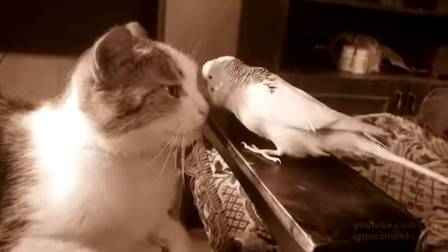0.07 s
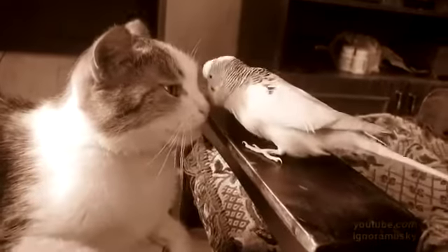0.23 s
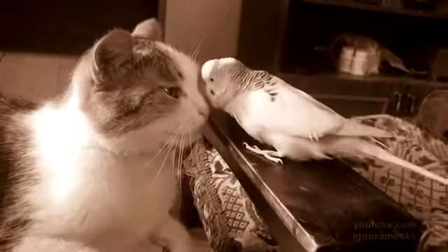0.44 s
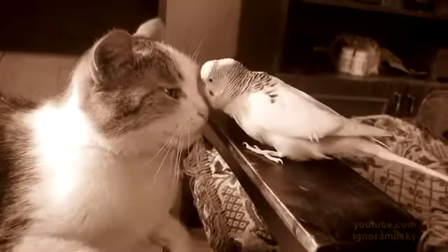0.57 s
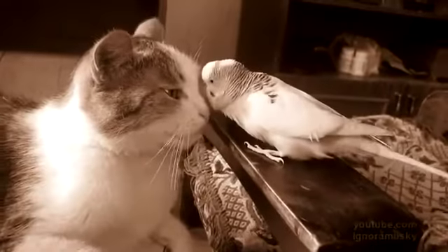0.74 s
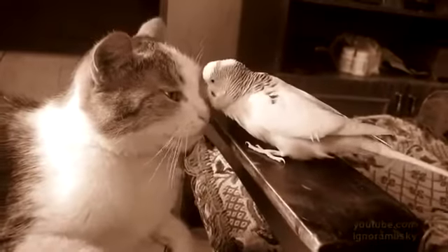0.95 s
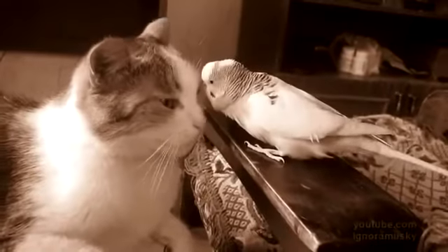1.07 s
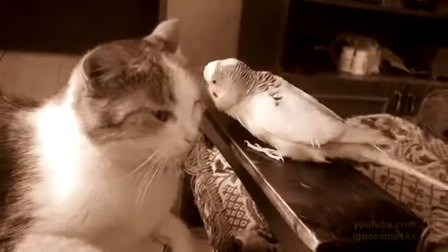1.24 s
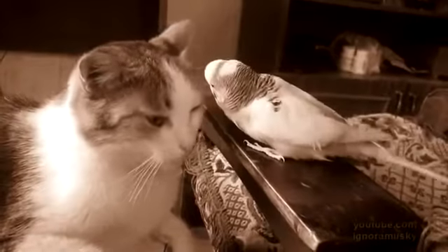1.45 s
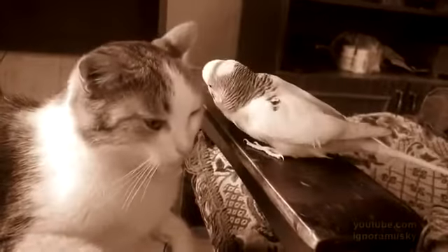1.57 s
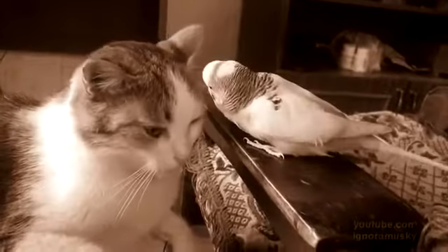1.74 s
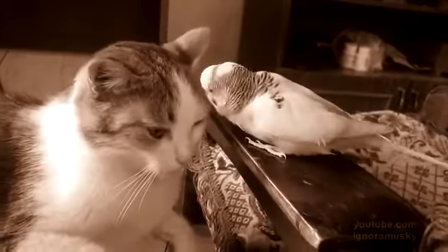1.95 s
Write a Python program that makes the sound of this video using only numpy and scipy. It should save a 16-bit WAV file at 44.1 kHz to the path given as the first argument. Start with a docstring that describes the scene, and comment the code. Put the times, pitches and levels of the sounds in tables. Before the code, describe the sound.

A budgerigar close by gives two tiny pips, then at 0.2 seconds a nasal rising call that breaks into one loud, harsh squawk at about 0.45 seconds. From 0.8 to 1.1 seconds it mutters a few soft, slurred notes, then chatters in rapid, high, ticking pips until about 2 seconds. Behind it, an appliance hums and whines faintly in the steady noise of a small furnished room.

```python
"""A budgerigar, close by in a small furnished room, gives two pips and a nasal rising call that breaks
into one harsh squawk, mutters a few soft slurs, then chatters in very short pips, about thirty a second.
Call and squawk follow the source-filter principle: a periodic or a chaotic source is shaped by the throat.
An appliance hums and whines behind it; the automatic gain ducks at the squawk and creeps back."""
import sys
import numpy as np
from scipy import signal
from scipy.fft import rfft, irfft
from scipy.io import wavfile
from scipy.ndimage import uniform_filter1d

SR = 44100
rng = np.random.default_rng(int(sys.argv[2]) if len(sys.argv) > 2 else 0)


def int16_out(signal):
    """Quantize to a 16-bit WAV file."""
    q = np.round(np.clip(np.atleast_2d(signal).T, -1, 1) * 32767)
    wavfile.write(sys.argv[1], SR, q.astype(np.int16))


N = 88200

# spectrum of the room noise: f/Hz, relative density/dB
ROOM_NOISE_SPECTRUM = [(25, -1.5), (75, -5), (120, -0.5), (210, 2.5), (280, 6.5), (330, 1.5), (520, 2.5),
                       (750, -2), (1100, -1), (1600, -4), (3100, -6), (4500, -13), (7000, -24.5),
                       (10000, -30.5), (15000, -38)]
# partials of the appliance's hum: f/Hz, rms level/dB, wander/Hz
HUM_PARTIALS = [(117.3, -55, 3), (172.4, -59, 12.5), (270, -51.5, 7.1), (394.5, -54.5, 2.14),
                (460, -51, 2.53), (690, -53.5, 1.1), (1152, -54, 15.3)]
# chatter pips: start t/s, peak level/dB, f/Hz, length/ms
CHATTER_PIPS = [(.0097, -21.5, 5770, 0.97), (.035, -32.5, 5940, 1.3), (1.1303, -27.5, 2940, 2.4),
                (1.1635, -17.5, 3450, 1.03), (1.1941, -14.5, 3500, 1), (1.225, -18, 3070, 3.2),
                (1.2544, -18, 3180, 3), (1.2844, -16, 2960, 4.3), (1.3155, -24, 3240, 2.1),
                (1.3466, -24, 3500, 2.3), (1.3774, -26, 3080, 1.6), (1.409, -19.5, 2980, 3.3),
                (1.4408, -20.5, 2670, 3.7), (1.4719, -18.5, 2720, 5.2), (1.5041, -20, 2730, 3.7),
                (1.5385, -26.5, 2600, 0.96), (1.6304, -23, 3570, 1.2), (1.668, -20, 2980, 1.9),
                (1.702, -19.5, 2520, 2.5), (1.7331, -15, 2770, 4.3), (1.7657, -17, 2740, 4.1),
                (1.7989, -19, 2700, 4.7), (1.8326, -22, 2800, 3.1), (1.8664, -18, 2780, 4.5),
                (1.901, -18, 2560, 3), (1.934, -18.5, 2580, 1.8), (1.967, -15.5, 3700, 1.03)]
# course of the rising call: t/s, pitch f/Hz, level/dB, beak resonance f/Hz
CALL_CONTOUR = [(.213, 796, -46, 2100), (.219, 853.5, -33.5, 2100), (.231, 875, -25.5, 3500),
                (.245, 809, -32, 3270), (.256, 825, -40, 3350), (.261, 835, -43, 3400),
                (.266, 862, -35, 3530), (.275, 940, -36, 3930), (.288, 967, -34, 4850),
                (.307, 1008, -40.5, 4720), (.347, 1012, -42, 4600), (.36, 1119, -39.5, 5670),
                (.38, 1199, -38, 4660), (.389, 1336, -33.5, 5400), (.406, 1410, -31, 2850),
                (.42, 1502, -60, 3000)]
# spectral envelope of the call: f/Hz, relative level/dB
THROAT_SPECTRUM = [(850, 0), (2600, -3), (3500, -3.5), (4300, -9.5), (6100, -13), (7000, -24), (14000, -57)]
# envelope of the squawk: t/s, level/dB
SQUAWK_ENVELOPE = [(.388, -47), (.405, -35.5), (.411, -26.5), (.421, -23.5), (.427, -16), (.438, -9.5),
                   (.444, -14), (.4505, -7), (.456, -12.5), (.467, -21), (.483, -19.5), (.495, -28),
                   (.515, -46)]
# throat resonances in the squawk: f/Hz, bandwidth/Hz, gain/dB
THROAT_MODES = [(920, 110, -10.5), (2060, 940, -2.5), (3326, 680, 7), (5530, 790, 5), (6460, 310, 4.5),
                (8000, 1540, -3.5), (11700, 5900, -38)]
# added gain of the deep resonances: t/s, gain/dB
DEEP_MODE_GAIN = [(.424, -11), (.441, 2.5)]
# sharp cracks in the squawk: t/s, level/dB
SQUAWK_CRACKS = [(0.4376, -2), (.4398, -6), (.4493, 2.5), (.482, -14)]
# envelope of the mutter: t/s, level/dB
MUTTER_ENVELOPE = [(.78, -70), (.82, -43.5), (.89, -48), (.95, -50), (1.0, -46.5), (1.05, -45), (1.09, -55)]
# slurred notes: start t/s, length/s, start f/Hz, end f/Hz, level/dB, step per overtone/dB
SLUR_NOTES = [(0.803, 0.023, 1013, 1170, -42, -2), (0.824, 0.053, 951, 909, -37.5, -4.5),
              (0.988, .029, 1213, 932, -35.5, -4.5), (1.014, .014, 1650, 1530, -34.5, -6.5),
              (1.026, .016, 2440, 1440, -28.5, -33), (1.041, 0.018, 1378, 970, -38.5, -6),
              (1.261, 0.0095, 1850, 2300, -39, -21), (1.388, 0.0099, 1990, 2280, -36.5, -35),
              (1.419, .011, 1860, 2520, -33, -32), (1.452, 0.0091, 1620, 2300, -35, -24),
              (1.482, 0.0107, 2030, 2650, -35, -12), (1.74, 0.0091, 2000, 2460, -34.5, -20),
              (1.773, 0.0094, 1670, 2200, -37, -16), (1.908, .015, 1430, 2170, -34.5, -14),
              (1.943, 0.008, 1570, 1820, -42, -8)]


def from_db(db):
    """Decibels to amplitude ratio."""
    return 10 ** (np.asarray(db) / 20)


def rms_one(x):
    """Normalisation to unit rms."""
    return x / np.sqrt(np.mean(x ** 2) + 1e-20)


def flatten(x):
    """Division by the running rms levels the envelope."""
    return x / np.sqrt(uniform_filter1d(x ** 2, size=300) + 1e-12)


def seconds():
    """The time of every sample."""
    return np.arange(N) / SR


def in_time(rows):
    """Linear interpolation of each column in time."""
    times, *columns = np.transpose(rows)
    return [np.interp(seconds(), times, column) for column in columns]


def during(rows):
    """A rectangular window spanning a curve."""
    return (seconds() > rows[0][0]) & (seconds() < rows[-1][0])


def at_hz(points, hz):
    """Interpolation of a spectrum in log frequency."""
    f, db = np.transpose(points)
    return np.interp(np.log(hz + 1), np.log(f), db)


def noise(shape):
    """Spectral shaping: unit-rms noise with amplitude spectrum shape(f)."""
    f = np.arange(N // 2 + 1) * SR / N
    return rms_one(irfft(rfft(rng.standard_normal(N)) * shape(f), N))


def drift(rate_hz):
    """Low-pass noise: a random wander of unit rms."""
    return noise(lambda f: 1 / (1 + (f / rate_hz) ** 2))


def cut(x, hz, kind, order=2):
    """Butterworth low- or high-pass filtering."""
    return signal.sosfilt(signal.butter(order, hz, kind, fs=SR, output="sos"), x + 1e-18)


def resonate(x, hz, width_hz):
    """A two-pole resonator with unit peak gain."""
    r = np.exp(-np.pi * width_hz / SR)
    feedback = [1, -2 * r * np.cos(2 * np.pi * hz / SR), r * r]
    return signal.lfilter(np.array([1, 0, -1]) * (1 - r * r) / 2, feedback, x + 1e-18)


def phase_of(hz):
    """Phase as the integral of frequency."""
    return 2 * np.pi * np.cumsum(hz) / SR


def room_noise(level_db=-41.5, flutter_db=.6):
    """Broadband noise with slight random amplitude modulation."""
    air = noise(lambda f: from_db(at_hz(ROOM_NOISE_SPECTRUM, f)))
    return air * from_db(level_db + flutter_db * drift(35))


def appliance(whirr_hz=2812, whirr_db=-52.5, whine_hz=7860, whine_db=-60.5, flutter_db=1.42):
    """Superposition of a narrow-band whirr with a whine and a hum under random frequency modulation."""
    whirr = from_db(whirr_db) * noise(lambda f: 1 / (1 + ((f - whirr_hz) / 40) ** 2))
    whine = from_db(whine_db) * np.sqrt(2) * np.sin(phase_of(whine_hz + 50 * drift(500)))
    hum = np.zeros(N)
    for hz, db, wander_hz in HUM_PARTIALS:
        phase = phase_of(hz + wander_hz * drift(37.5)) + rng.uniform(0, 2 * np.pi)
        hum += from_db(db + flutter_db * drift(26)) * np.sqrt(2) * np.sin(phase)
    return whirr + whine + hum


def chatter(rise_share=.24, glide_per_ms=.13, steady_ms=3.3, snap_db=-10, snap_hz=4100, snap_s=.0003):
    """Tone bursts, each begun by a damped snap; brevity widens the spectrum, so the shortest are ticks."""
    pips = np.zeros(N)
    skew = np.log(.5) / np.log(rise_share)
    for start, db, hz, length_ms in CHATTER_PIPS:
        age = seconds() - start
        active = (age > 0) & (age < length_ms / 1000)
        age = age[active]
        progress = age * 1000 / length_ms
        glide = glide_per_ms * (length_ms - steady_ms)  # long pips rise, short ones fall
        pitch = hz * (1 + glide * (progress - .5))
        swell = np.sin(np.pi * progress ** skew) ** 2
        snap = from_db(snap_db) * np.exp(-age / snap_s) * np.sin(2 * np.pi * snap_hz * age)
        pips[active] += from_db(db) * (swell * np.sin(phase_of(pitch)) + snap)
    return cut(cut(pips, 1500, "high", order=3), 6700, "low", order=5)


def rising_call(harmonics=14, jitter=.013, shimmer_db=2.4, rasp_db=-11,
                beak_width_hz=530, beak_boost_db=9.5, easy_hz=1145, odd_loss_db_per_octave=51):
    """Source and filter: throat and moving beak resonance weight the harmonics; strain fades odd ones."""
    pitch, level_db, beak_hz = in_time(CALL_CONTOUR)
    strain_octaves = np.maximum(np.log2(pitch / easy_hz), 0)
    pitch = pitch * (1 + jitter * drift(294))
    phase, voice = phase_of(pitch), np.zeros(N)
    for k in range(1, harmonics + 1):
        beak_db = beak_boost_db / (1 + (2 * (k * pitch - beak_hz) / beak_width_hz) ** 2)
        strain_db = -odd_loss_db_per_octave * strain_octaves * (k % 2)
        harmonic_db = at_hz(THROAT_SPECTRUM, k * pitch) + beak_db + strain_db + shimmer_db * drift(100)
        voice += from_db(harmonic_db) * np.sin(k * phase + rng.uniform(0, 2 * np.pi))
    breath = noise(lambda f: from_db(at_hz(THROAT_SPECTRUM, f)) * (f > THROAT_SPECTRUM[0][0]))
    rasp = from_db(rasp_db) * breath * (1 + np.cos(phase))  # one puff per cycle
    return (flatten(voice) + rasp) * from_db(level_db) * during(CALL_CONTOUR)


def open_throat(source, deep_below_hz=2500, sizzle_db=-28.5):
    """Parallel resonators filter the source, the deep ones entering late; a little sizzle gets past."""
    source = cut(source, 680, "high")
    deep_db, = in_time(DEEP_MODE_GAIN)
    voice = np.zeros(N)
    for k, (hz, width_hz, db) in enumerate(THROAT_MODES):
        gain = from_db(db + deep_db * (hz < deep_below_hz))
        voice += (-1) ** k * gain * resonate(source, hz, width_hz)
    return cut(voice, 7250, "low", order=6) + from_db(sizzle_db) * source


def squawk(pulses_per_s=900, jitter=.3, spread_db=2.5):
    """Forced resonance: chaotic pulses, rushing air and a few impulsive cracks ring the throat."""
    cycles = np.floor(np.cumsum(pulses_per_s * np.exp(jitter * drift(500))) / SR)
    pulses = np.diff(cycles, prepend=0) * from_db(spread_db * rng.standard_normal(N))
    air = rng.standard_normal(N)
    voice = flatten(open_throat(rms_one(pulses) + air))
    level_db, = in_time(SQUAWK_ENVELOPE)
    impulses = np.zeros(N)
    for start, db in SQUAWK_CRACKS:
        impulses[int(start * SR)] = from_db(db)
    cracks = open_throat(impulses)
    cracks *= impulses.max() / np.abs(cracks).max()
    return voice * from_db(level_db) * during(SQUAWK_ENVELOPE) + cracks


def mutter(low_hz=840, top_hz=2010, flutter_db=2):
    """Amplitude-modulated band noise: a faint unpitched scratching in the bird's low range."""
    level_db, = in_time(MUTTER_ENVELOPE)
    scratch = cut(rng.standard_normal(N), low_hz, "high", order=4)
    scratch = rms_one(cut(scratch, top_hz, "low", order=3))
    return scratch * from_db(level_db + flutter_db * drift(120)) * during(MUTTER_ENVELOPE)


def slurs(jitter=.04, rasp_db=-10, top_hz=3020):
    """Soft exponential glides of three harmonics, roughened by frequency and amplitude modulation."""
    notes = np.zeros(N)
    waver = 1 + jitter * drift(290)
    for start, length, start_hz, end_hz, db, overtone_db in SLUR_NOTES:
        active = (seconds() > start) & (seconds() < start + length)
        progress = (seconds()[active] - start) / length
        phase = phase_of(start_hz * (end_hz / start_hz) ** progress * waver[active])
        tone = sum(from_db(db + k * overtone_db) * np.sin((k + 1) * phase) for k in range(3))
        notes[active] += np.sin(np.pi * progress) ** .6 * tone
    return cut(notes * (1 + from_db(rasp_db) * drift(500)), top_hz, "low", order=3)


def reverberation(x, t60_s=.22, delay_s=.0056, top_hz=6050, level_db=-18):
    """Convolution with an exponentially decaying diffuse tail, dulled by the furnishings."""
    t = seconds()
    tail = cut(rng.standard_normal(N), top_hz, "low", order=1)
    tail *= 10 ** (-3 * t / t60_s) * (t > delay_s)
    return from_db(level_db) * signal.fftconvolve(x, tail / np.sqrt(np.sum(tail ** 2)))[:N]


def scene():
    """Superposition of the bird, its reverberation and the steady background, in mono."""
    bird = rising_call() + squawk() + slurs() + mutter() + chatter()
    return (bird + reverberation(bird) + room_noise() + appliance())[None]


def record(dry):
    """Automatic gain control ducks on loud sound and recovers slowly; a low-pass limits the band."""
    threshold_db, cutoff_hz = -18, 14800
    window_s, attack_s, release_s = .0062, .01, .27
    power = uniform_filter1d(dry[0] ** 2, size=int(window_s * SR))
    excess_db = np.maximum(10 * np.log10(np.maximum(power, 1e-12)) - threshold_db, 0)
    release = np.exp(-seconds() / release_s)
    held_db = np.maximum.accumulate(excess_db / release) * release  # decaying peak hold
    pole = np.exp(-1 / (attack_s * SR))
    duck_db = signal.lfilter([1 - pole], [1, -pole], held_db)
    low_pass = signal.ellip(10, .2, 80, cutoff_hz, fs=SR, output="sos")
    return signal.sosfilt(low_pass, dry * from_db(-duck_db))


dry = scene()
out = record(dry)
int16_out(out)
```